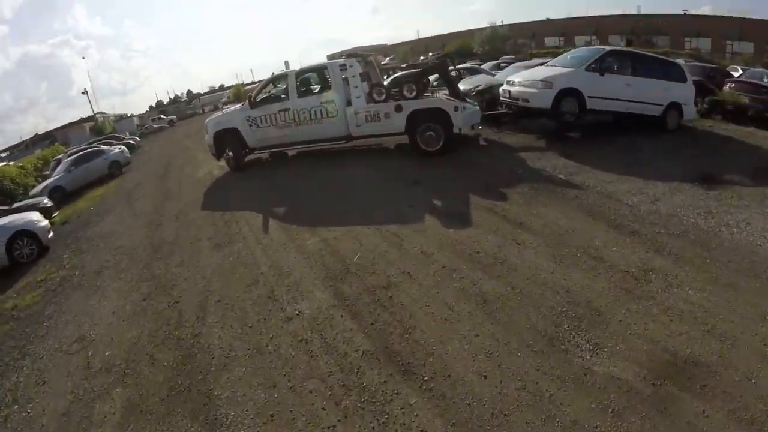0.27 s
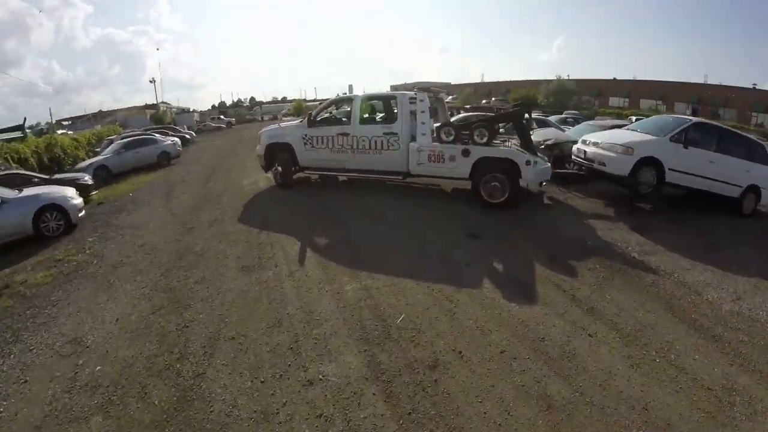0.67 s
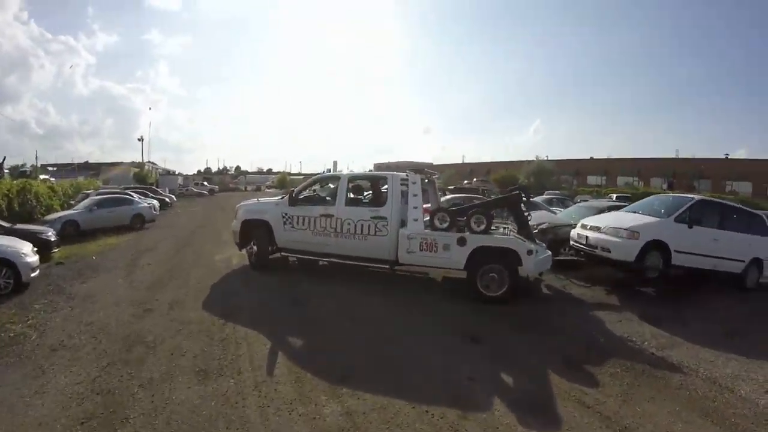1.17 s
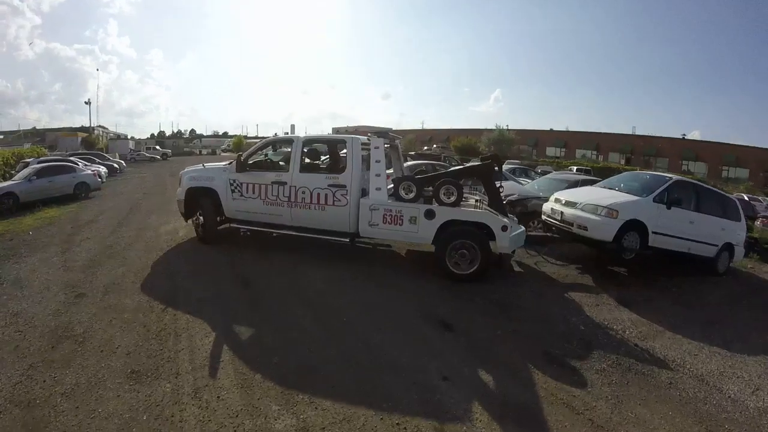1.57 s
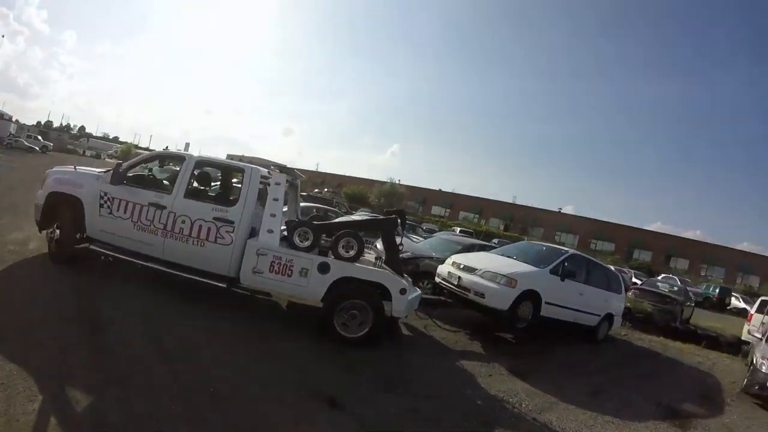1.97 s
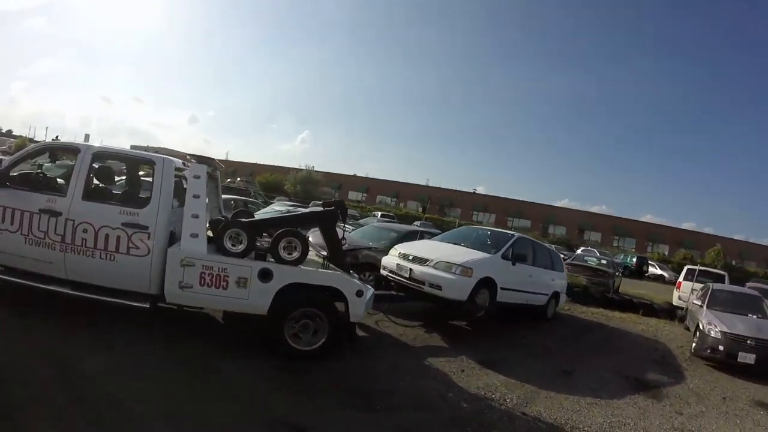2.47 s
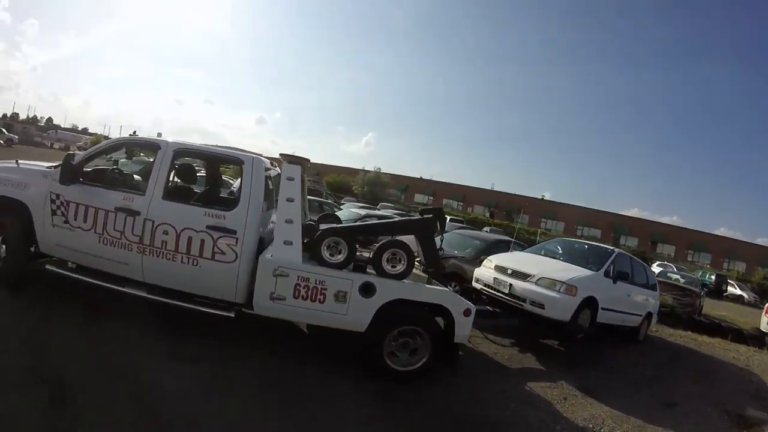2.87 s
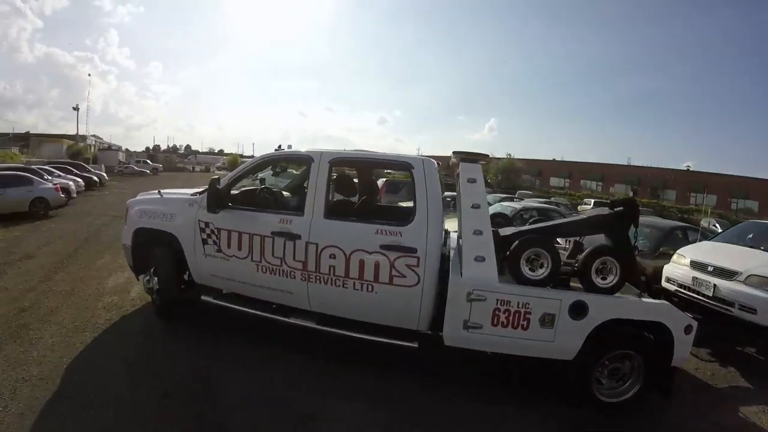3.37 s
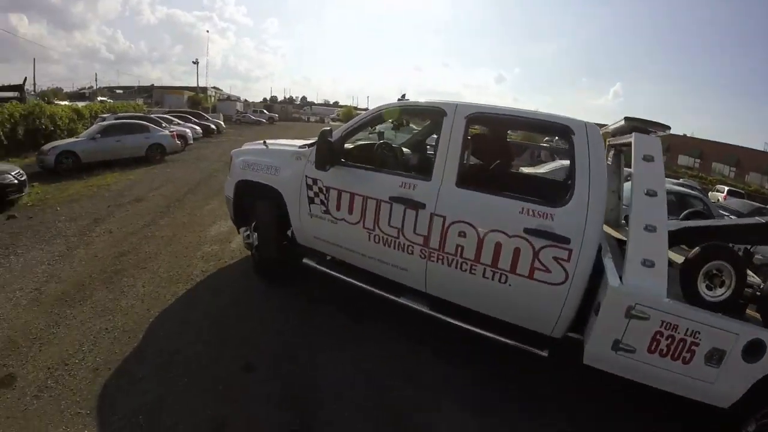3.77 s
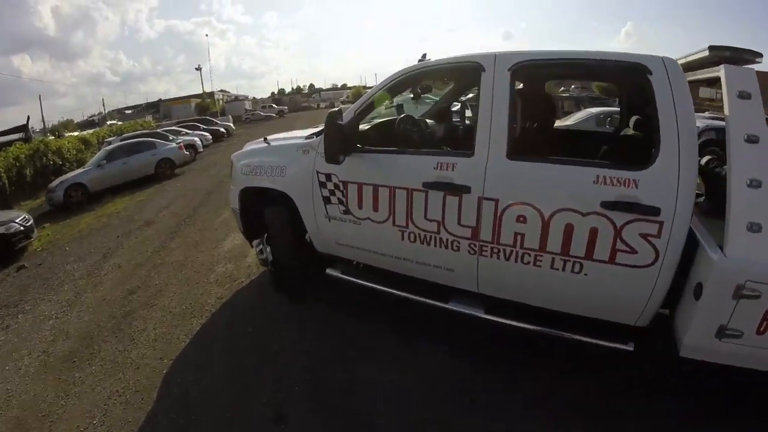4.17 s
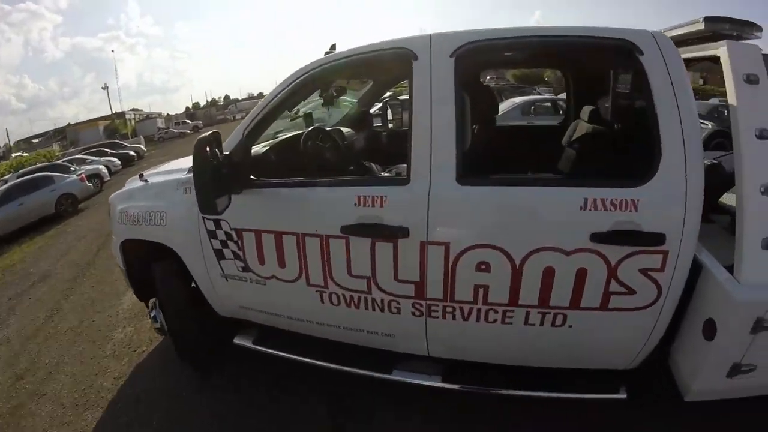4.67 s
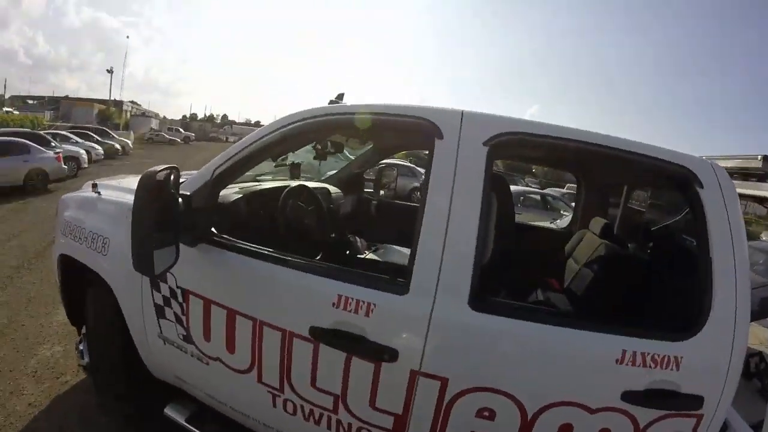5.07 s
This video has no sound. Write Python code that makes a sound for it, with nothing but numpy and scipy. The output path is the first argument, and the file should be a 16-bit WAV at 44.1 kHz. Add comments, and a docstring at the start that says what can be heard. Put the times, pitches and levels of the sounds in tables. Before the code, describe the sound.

A diesel tow truck idles with a metallic clatter, growing louder as someone walks up to it with low, thudding steps.

```python
"""Idling diesel V8 tow truck, heard from the body camera of someone walking up to it over gravel.
Eight uneven combustion knocks per cycle ring the engine's metal, louder and brighter on approach.
A narrow hiss swells once and cuts off. Each step jolts the camera on its mount (deep thuds),
shifts clothing and faintly crunches grit. Distant traffic lies underneath."""
import sys
import numpy as np
from scipy import signal
from scipy.fft import rfft, irfft
from scipy.io import wavfile
from scipy.ndimage import map_coordinates

SR = 44100
rng = np.random.default_rng(int(sys.argv[2]) if len(sys.argv) > 2 else 0)


def int16_out(signal):
    """Quantize to a 16-bit WAV file."""
    q = np.round(np.clip(np.atleast_2d(signal).T, -1, 1) * 32767)
    wavfile.write(sys.argv[1], SR, q.astype(np.int16))


N = 234964
T = np.arange(N) / SR
FREQS_HZ = np.maximum(np.fft.rfftfreq(N, 1 / SR), 1)

# strike per cylinder, in firing order: block/dB, sump/dB, cover/dB, head/dB
CYLINDER_STRIKES = [(-3.5, 1, -4, 0), (5.5, 4, -1.5, 1.5), (.5, -.5, -6, 1), (-1.5, -2, 2, -.5),
                    (-3.5, -1.5, 2.5, 2.2), (-1.5, -1, 1.5, -2.5), (-1, -1.5, -1, -2.5), (-1, 0, .5, .5)]
# resonances of the engine parts: f/Hz, width/Hz, level/dB
BLOCK_MODES = [(1142, 143, -4), (1306, 300, -4), (1505, 55, 3.5), (1581, 122, 1), (1740, 300, -3.5)]
SUMP_MODES = [(1886, 90, -2.5), (1935, 200, -2.5), (2173, 284, 1.5), (2335, 290, -6.5), (2764, 155, -1.5),
              (3440, 180, -3.5), (3780, 490, -9)]
COVER_MODES = [(2492, 61, 0)]
HEAD_MODES = [(2992, 305, -1), (3154, 125, 4.5), (3320, 255, 0), (3956, 350, -10.5), (4615, 260, -17)]
TICK_MODES = [(4330, 2900, -6.5), (7780, 1700, -9)]
SIZZLE_MODES = [(6220, 640, 0)]
# hiss bands: f/Hz, width/Hz, level/dB
HISS_BANDS = [(3300, 260, -6), (3440, 170, -6.5)]
# walker to engine: t/s, distance/m
WALK_PATH = [(0, 8.8), (1.0, 9.5), (1.7, 6), (2.4, 4.44), (3.3, 3.54), (5.33, 3.67)]
# steps: t/s, heel/dB, f/Hz, forefoot lag/s, forefoot/dB, shudder re jolt/dB, grit/dB, scuff width/s
FOOTFALLS = [(0.384, -22.5, 22, 0.054, -21.5, -6, -56.5, 0.015),
             (0.916, -21.5, 19.7, .040, -25, -7, -50.5, 0.0078), (1.466, -17, 27, 0.052, -22, -8, -72, .03),
             (2.017, -22.5, 26, 0.05, -27, -3.5, -67, .03), (2.471, -25, 39, 0.051, -24, -1, -55.5, 0.028),
             (2.616, -25, 29.8, .036, -26, -3.5, -71, .03), (3.102, -20, 22, 0.0398, -22, -7, -62.5, .05),
             (3.655, -23, 33.4, 0.0765, -30.5, -3.5, -61.5, .04),
             (4.204, -24, 24, 0.049, -21.5, -8, -64, 0.038), (4.714, -29, 31, .054, -30.5, 5.5, -58, 0.011)]
# low thuds of walking, some within a step, some between steps: t/s, peak/dB, f/Hz
WALK_THUDS = [(0.758, -32, 29.2), (0.89, -23.5, 36.7), (2.947, -30, 39), (3.047, -25, 37.3),
              (3.378, -29.5, 62), (3.602, -33, 41.5), (4.431, -33, 59), (4.865, -28.5, 21.7),
              (5.155, -37, 49.6), (5.291, -40, 45)]
# spectra of clothing, grit, and traffic with open air: f/Hz, relative level/dB
CLOTH_SPECTRUM = [(15, -.5), (35, 6.5), (65, 3), (95, -18), (150, -27), (400, -56), (2000, -96)]
GRIT_SPECTRUM = [(200, -34), (500, 6.5), (1200, 13), (2200, 12.5), (3200, -7), (5000, -19), (9000, -17),
                 (15000, -38)]
TRAFFIC_SPECTRUM = [(10, -2.5), (25, 3.5), (55, -1), (100, -14), (250, -17.5), (500, -22), (900, -26),
                    (2000, -27.5), (3400, -24.5), (4400, -36.5), (5500, -39.5), (8000, -43), (11000, -50),
                    (15000, -56.5)]


def diesel(firing_hz=42.865, first_s=.014, jitter_s=.0005, scatter_db=1.1):
    """Firings rattle block, sump, valve cover and head; injectors tick and sizzle."""
    firing = np.arange(int(N / SR * firing_hz))
    chance = rng.standard_normal((len(firing), 2))
    times_s = first_s + firing / firing_hz + jitter_s * chance[:, 0]
    strikes_db = np.array(CYLINDER_STRIKES)[firing % len(CYLINDER_STRIKES)].T
    on_block, on_sump, on_cover, on_head = strikes_db + scatter_db * chance[:, 1]
    block_db, sump_db, head_db, sizzle_db = approach()
    near_db = sump_db - sump_db.mean()
    # ring grows faster than rattle: the hardest cylinder clanks once a cycle, clearest close by
    clank = clink(times_s, 1.4 * on_block, hz=1562, spread_hz=22, decay_s=.017)
    clank *= undb(-4.8 + .08 * near_db)
    chink = clink(times_s, 2 * on_sump, hz=2195, spread_hz=18, decay_s=.015) * undb(-9 + .2 * near_db)
    chink += clink(times_s, on_sump, hz=1897, spread_hz=10, decay_s=.02) * undb(-14 + .4 * near_db)
    block = rattle(knocks(times_s, on_block, decay_s=.015, churn=.42), BLOCK_MODES) + clank
    sump = rattle(knocks(times_s, on_sump, decay_s=.018, churn=.52), SUMP_MODES) + chink
    cover = rattle(knocks(times_s, on_cover, decay_s=.0037, churn=.049), COVER_MODES)
    cover += undb(-1.5) * clink(times_s, on_cover, hz=2492, spread_hz=27, decay_s=.0071)
    head = rattle(knocks(times_s, on_head, decay_s=.012, churn=.26), HEAD_MODES)
    ticks = rattle(knocks(times_s, on_head, decay_s=.0044, churn=.26), TICK_MODES)
    sizzle = rattle(knocks(times_s, on_head, decay_s=.024, churn=.24), SIZZLE_MODES)
    return (block * undb(block_db) + sump * undb(sump_db) + head * undb(head_db)
            + cover * undb(-67 + .55 * near_db) + ticks * undb(sump_db - 20.5)
            + sizzle * undb(sizzle_db))


def knocks(times_s, strikes_db, decay_s, churn, rise_s=.0024):
    """Combustion force: one fast pulse per firing over a steady churn."""
    force = np.zeros(N)
    for at_s, size in zip(times_s, undb(strikes_db)):
        span, age_s = after_strike(at_s)
        force[span] += size * np.exp(-age_s / decay_s) * (1 - np.exp(-age_s / rise_s))
    return force + churn


def rattle(force, modes):
    """Force-scaled noise drives each mode; squared responses keep the valleys dark. Unit rms."""
    spectrum = 0
    for hz, width_hz, db in modes:
        response = 1 / (1 + 1j * (FREQS_HZ / hz - hz / FREQS_HZ) * hz / width_hz) ** 2
        spectrum += undb(db) * response * rfft(force * rng.standard_normal(N))
    return level(irfft(spectrum, N), 0)


def clink(times_s, strikes_db, hz, spread_hz, decay_s):
    """Clean metal ring, restruck and slightly detuned at each firing. Unit rms."""
    out = np.zeros(N)
    for at_s, size, detune in zip(times_s, undb(strikes_db), rng.standard_normal(len(times_s))):
        span, age_s = after_strike(at_s)
        fade = np.exp(-age_s / decay_s) - np.exp(-4 * age_s / decay_s)
        out[span] += size * fade * np.sin(2 * np.pi * (hz + spread_hz * detune) * age_s)
    return level(out, 0)


def approach(abreast_s=4.34, half_width_s=.77):
    """Part gains fall with distance. Abreast, the sump radiates under the cab; the door shades sizzle."""
    distance_m = np.interp(T, *np.transpose(WALK_PATH))
    loss_db = 20 * np.log10(distance_m)
    abreast = np.exp(-((T - abreast_s) / half_width_s) ** 4)
    block_db = -44.5 - loss_db
    sump_db = -56 - .41 * loss_db + 9.5 * abreast
    head_db = -46 - .89 * loss_db
    sizzle_db = -51.5 - 1.404 * loss_db - 2.5 * abreast
    return block_db, sump_db, head_db, sizzle_db


def hiss(top_s=2.53, top_db=-53.5, swell_db_per_s=17, release_db_per_s=204, climb_per_s=.07):
    """Narrow hiss from the truck: swells, climbs in pitch, cuts off."""
    before_s, after_s = np.maximum(top_s - T, 0), np.maximum(T - top_s, 0)
    steady = rattle(np.ones(N), HISS_BANDS)
    climbing = map_coordinates(steady, [np.cumsum(1 - climb_per_s * before_s)], mode="mirror")
    return climbing * undb(top_db - swell_db_per_s * before_s - release_db_per_s * after_s)


def jolts(thud_shudder_db=-18):
    """Low walking thuds, heel and forefoot landings: t/s, peak/dB, f/Hz, shudder/dB."""
    out = [(at_s, db, hz, thud_shudder_db) for at_s, db, hz in WALK_THUDS]
    for at_s, heel_db, hz, lag_s, forefoot_db, shudder_db, _, _ in FOOTFALLS:
        out += [(at_s, heel_db, hz, shudder_db), (at_s + lag_s, forefoot_db, hz, shudder_db)]
    return out


def thuds(mount_hz=50, decay_s=.037, rise_s=.021, skew=.081):
    """Each jolt pushes the camera in fast and lets it back slower; the mount shudders briefly."""
    out = np.zeros(N)
    for at_s, db, hz, shudder_db in jolts():
        span = slice(max(int((at_s - .1) * SR), 0), int((at_s + .3) * SR))
        age_s = T[span] - at_s
        exponent = (np.pi * hz * age_s * (1 - skew * np.sign(age_s))) ** 2
        push = (2 * exponent - 1) * np.exp(-exponent)  # acceleration of a bell-shaped displacement
        after_s = np.maximum(age_s, 0)
        fade = np.exp(-after_s / decay_s) * (1 - np.exp(-(after_s / rise_s) ** 2))
        shudder = -np.cos(2 * np.pi * mount_hz * after_s) * fade
        out[span] += undb(db) * (push + undb(shudder_db) * shudder)
    return out


def clothing(lag_s=.0049, width_s=.039, re_jolt_db=-19):
    """Cloth shifts under the camera at each jolt: a dull murmur."""
    power = sum(undb(2 * db) * np.exp(-((T - at_s - lag_s) / width_s) ** 2) for at_s, db, _, _ in jolts())
    murmur = colour(rng.standard_normal(N), CLOTH_SPECTRUM)
    return level(murmur, re_jolt_db) * np.sqrt(power)


def gravel(grains_per_s=4000, spread_db=7, lead_s=.016, forefoot_db=-3):
    """Stones click together under heel and forefoot, just before the jolt reaches the chest."""
    hits = rng.random(N) < grains_per_s / SR
    sizes = undb(spread_db * np.minimum(rng.exponential(size=N), 3)) * rng.choice([-1, 1], N)
    pressure = np.zeros(N)
    for at_s, _, _, lag_s, _, _, grit_db, width_s in FOOTFALLS:
        heel, forefoot = (np.exp(-.5 * ((T - s + lead_s) / width_s) ** 2) for s in (at_s, at_s + lag_s))
        pressure += undb(grit_db) * (heel + undb(forefoot_db) * forefoot)
    return level(colour(hits * sizes, GRIT_SPECTRUM), 0) * pressure


def traffic(rms_db=-47.5):
    """Steady far rumble with faint hiss."""
    return level(colour(rng.standard_normal(N), TRAFFIC_SPECTRUM), rms_db)


def after_strike(at_s):
    """Slice and age/s of the 1/8 s after a strike."""
    start = max(int(at_s * SR), 0)
    span = slice(start, start + SR // 8)
    return span, T[span] - start / SR


def undb(db):
    """dB to gain."""
    return 10 ** (np.asarray(db) / 20)


def level(x, rms_db):
    """Scale to an rms level."""
    return x * undb(rms_db) / np.sqrt(np.mean(x ** 2))


def colour(x, spectrum):
    """Filter by points of f/Hz, level/dB."""
    hz, db = np.transpose(spectrum)
    return irfft(rfft(x) * undb(np.interp(np.log(FREQS_HZ), np.log(hz), db)), N)


def scene():
    """Truck, steps and traffic at the chest, mono."""
    return (diesel() + hiss() + thuds() + clothing() + gravel() + traffic())[None]


def record(dry, fade_s=.004, cutoff_hz=15150):
    """Camera: click-free ends, steep low-pass."""
    fade = np.minimum(np.minimum(T, T[-1] - T) / fade_s, 1)
    lowpass = signal.ellip(10, .1, 80, cutoff_hz, fs=SR, output="sos")
    return signal.sosfilt(lowpass, dry * fade)


dry = scene()
out = record(dry)
int16_out(out)
```